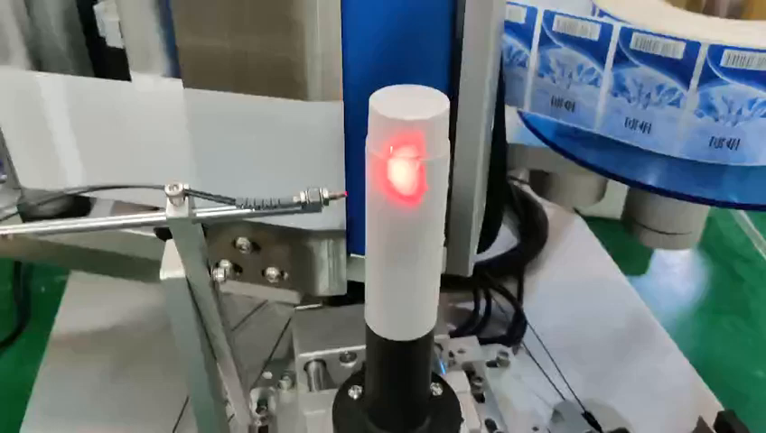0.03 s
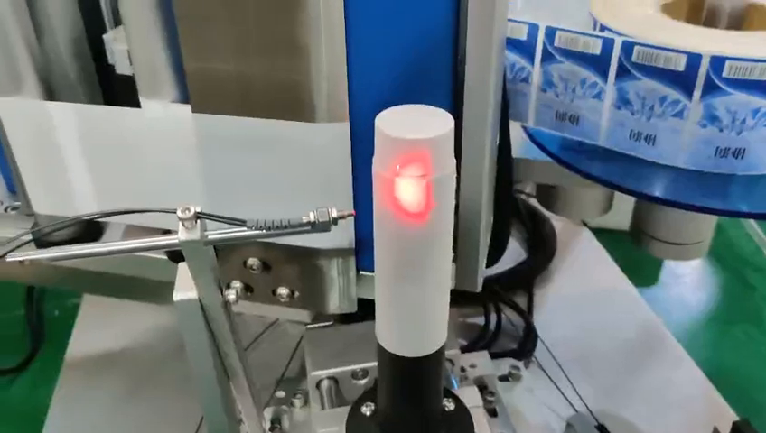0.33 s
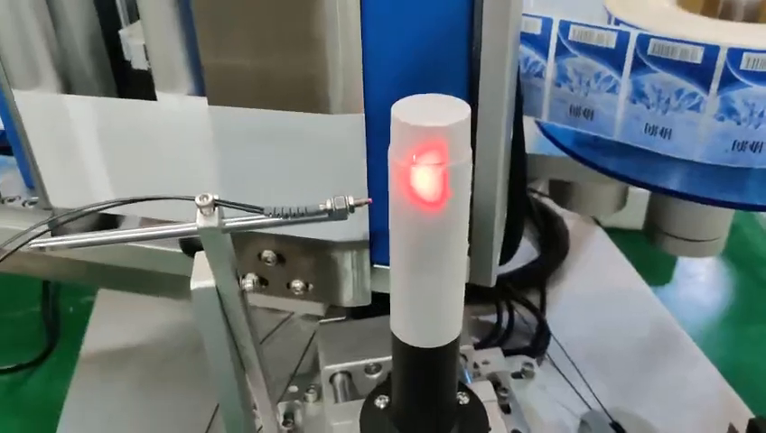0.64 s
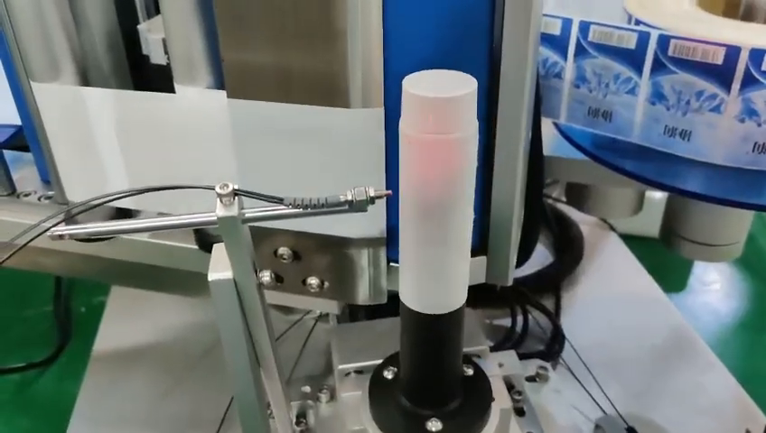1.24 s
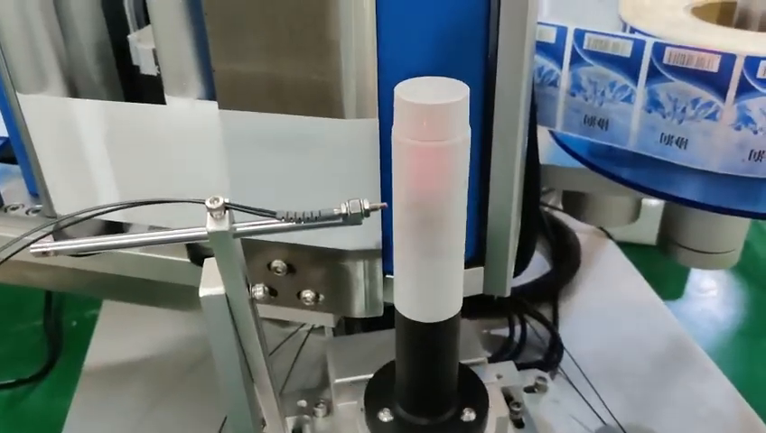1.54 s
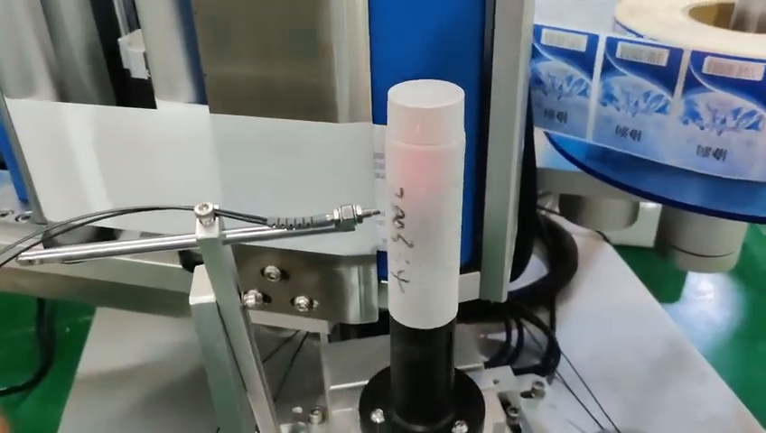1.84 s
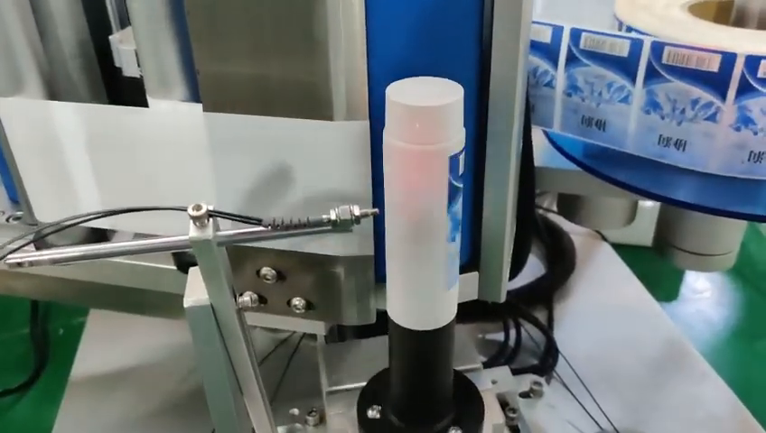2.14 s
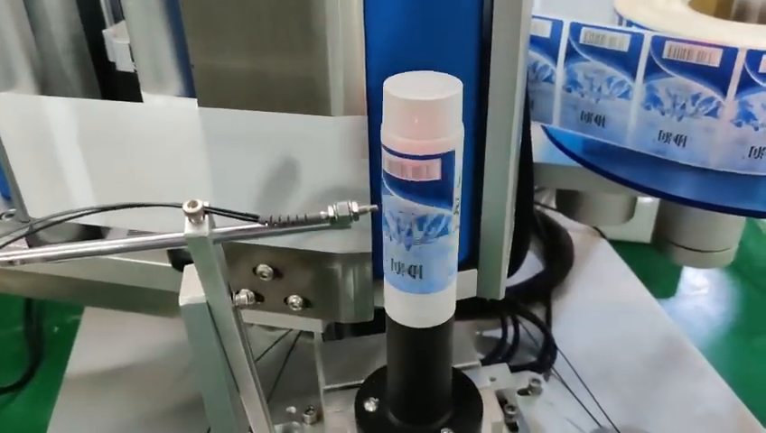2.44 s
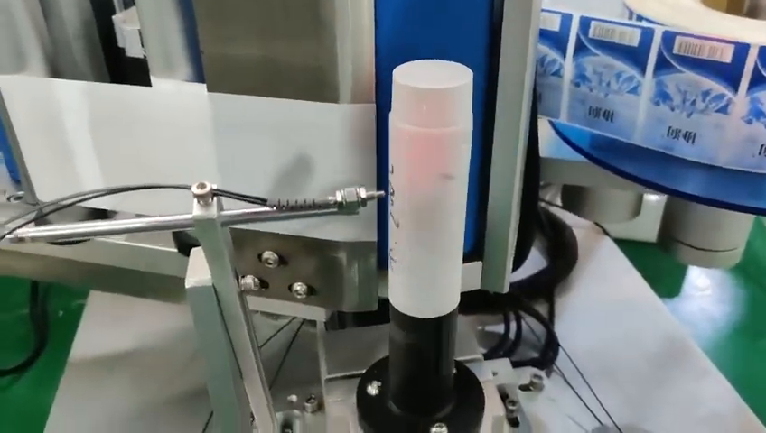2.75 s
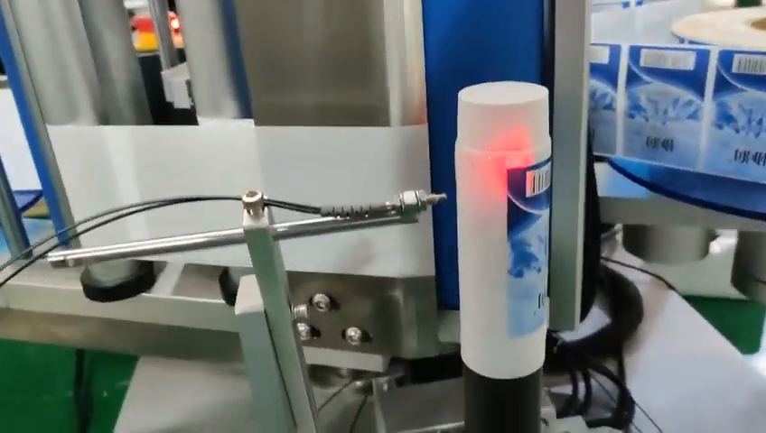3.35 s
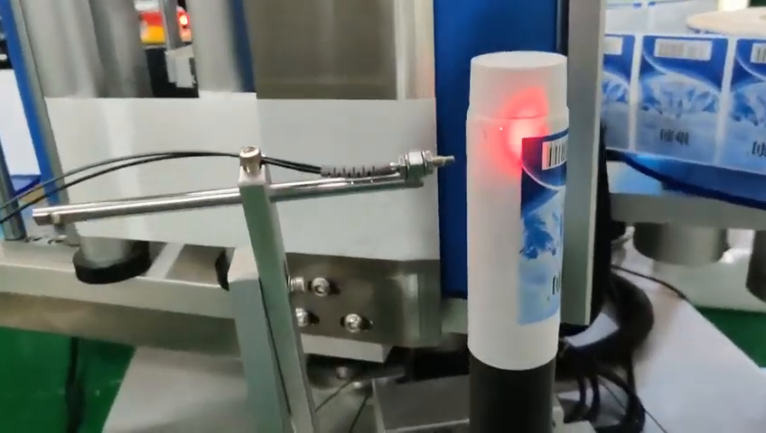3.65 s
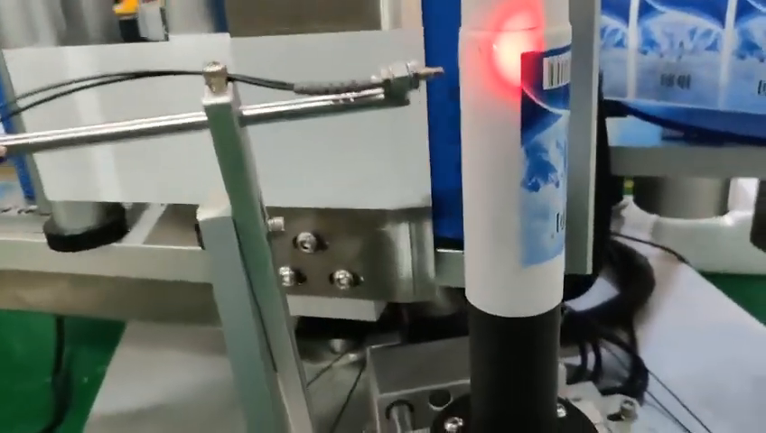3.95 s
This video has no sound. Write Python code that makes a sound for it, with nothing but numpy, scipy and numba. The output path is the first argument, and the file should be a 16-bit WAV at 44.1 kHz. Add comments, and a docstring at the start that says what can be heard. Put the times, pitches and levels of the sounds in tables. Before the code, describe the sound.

Close up in a workshop, a labeling machine runs with a steady hum and rushing hiss. Two sharp pneumatic clacks with short air bursts frame a soft paper rustle and faint motor whine. Gusts rumble on the microphone throughout.

```python
"""A workshop, with a phone held close to a labelling machine that hums and hisses. An air valve clacks
and vents as a tube is gripped; a feed motor whines, the label rustles on, and the valve lets go.
A draught buffets the phone's two microphone ports throughout. The recorder fades in, and its limiter
ducks each channel after the strong gusts."""
import sys
import numpy as np
from scipy import signal
from scipy.fft import rfft, irfft
from scipy.io import wavfile
from scipy.ndimage import uniform_filter1d, minimum_filter1d
from numba import njit

SR = 44100
rng = np.random.default_rng(int(sys.argv[2]) if len(sys.argv) > 2 else 0)


def bounce(signal):
    """Save signal as a 16-bit WAV file at the path given by the first command-line argument."""
    frames = np.transpose(np.atleast_2d(signal))
    limited = np.clip(frames, -1, 1)
    pcm = np.round(limited * 32767).astype(np.int16)
    wavfile.write(sys.argv[1], SR, pcm)


N = 176400


def spool_clicks(decay_s=.0012):
    """The valve spool shifts with tiny, bright clicks."""
    # Spool clicks: start_s, level_db, hold_s
    clicks = [(1.0372, -20, 0.0037), (1.2876, -24, 0.005), (3.0332, -7.5, 0.0036)]
    # Click spectrum: frequency_hz, density_db
    spectrum = [(200, -10), (1500, -2), (3000, 4), (4400, 6.5), (6500, -6), (9000, -7), (13800, -2),
                (16000, -1)]
    envelope = sum(undb(db) * burst(at, hold, decay_s) for at, db, hold in clicks)
    return unit(colour(noise(), spectrum)) * envelope


def piston_knocks(crack_db=-3.5, crack_s=.003, detune=.013):
    """The piston knocks home with a crack and sets the cylinder and bracket ringing."""
    # Piston impacts: start_s, level_db
    knocks = [(1.053, -2), (3.0426, 5.5)]
    # Cylinder and bracket modes: pitch_hz, level_db, t60_s
    modes = [(430, 11, 0.0051), (764, 3.5, 0.0064), (1400, -18, 0.053), (1983, -9, 0.081),
             (2386, 1.5, 0.013), (2650, -16, 0.019), (3200, -20, 0.05), (3900, -13, 0.026),
             (4460, -21, 0.046)]
    # Crack spectrum: frequency_hz, density_db
    spectrum = [(100, -30), (2500, -8), (6000, -40), (16000, 14)]
    crack = undb(crack_db) * unit(colour(noise(), spectrum))
    out = np.zeros((2, N))
    for at, db in knocks:
        age = np.maximum(times() - at, 0)
        ring = np.zeros((2, N))
        for hz, mode_db, t60 in modes:
            pitch = hz * (1 + detune * rng.standard_normal((2, 1)))
            ring += undb(mode_db - 60 * age / t60) * np.sin(2 * np.pi * pitch * age)
        out += undb(db) * (.5 * ring + crack * burst(at, 0, crack_s))
    return out


def air_vents(decay_s=.055, close_s=.008, outlet_width_hz=1300, sputter_db=-1):
    """Air sputters through a resonant outlet, fading until the cylinder is empty."""
    # Air releases: start_s, level_db, time_to_empty_s, outlet_hz, outlet_boost_db
    vents = [(1.055, -10.5, 0.064, 8370, 14), (3.047, -11.5, 0.052, 6600, 3)]
    # Jet spectrum: frequency_hz, density_db
    spectrum = [(300, -13), (1600, -16), (2400, 1), (3400, 3.5), (4300, 6), (5400, 2), (6400, -3),
                (7800, -12), (9700, -12), (11300, -6), (13000, -1), (14200, -5), (15600, -3)]
    out = np.zeros((2, N))
    for at, db, empty, outlet_hz, outlet_db in vents:
        outlet = undb(outlet_db * np.exp(-((freqs() - outlet_hz) / outlet_width_hz) ** 2))
        hiss = irfft(rfft(colour(noise(), spectrum)) * outlet, N)
        jet = unit(hiss * undb(sputter_db * walk(400)))
        out += undb(db) * jet * burst(at, 0, decay_s) * burst(at, empty, close_s)
    return out


def pneumatics(room_db=-16, room_t60_s=.32, right_bias_db=4.5):
    """Valve and cylinder sound to the right of the phone, and the workshop answers."""
    direct = spool_clicks() + piston_knocks() + air_vents()
    room = undb(room_db) * echoes(direct, room_t60_s / np.log(1000))
    return (direct + room) * undb([[-right_bias_db / 2], [right_bias_db / 2]])


def label_feed(motor_hz=2115, grain_db=1.8):
    """The feed motor whines while label and backing paper slide with a fine grain."""
    # Paper slides: centre_s, length_s, left_db, right_db
    rustles = [(1.166, 0.18, -41.5, -29), (1.784, 0.23, -41, -37), (1.985, .08, -46, -39),
               (2.277, 0.081, -43.5, -38), (2.745, 0.46, -52, -44.5), (2.948, 0.063, -58, -33.5),
               (3.13, 0.12, -41, -31.5)]
    # Paper spectrum: frequency_hz, density_db
    spectrum = [(1000, -37), (4000, -3.5), (7500, 3), (9300, -6.5), (13000, -1.5), (15500, -2)]
    # Feed motor whine: time_s, level_db
    motor_level = [(1.55, -60), (1.7, -40), (1.95, -46), (2.1, -52)]
    paper = unit(colour(noise(), spectrum) * undb(grain_db * walk(300)))
    sliding = sum(undb([[left], [right]]) * swell(at, length) for at, length, left, right in rustles)
    turns = np.cumsum(1 + .0005 * walk(10)) * motor_hz / SR
    whine = np.sqrt(2) * np.sin(2 * np.pi * turns)
    return paper * sliding + whine * curve(motor_level)


def fan_rush(shared=.18, left_lag_s=.000403, treble_hz=5700):
    """The fans rush with a drifting treble; a share reaches both ports alike, the left one later."""
    # Running noise of the machine: frequency_hz, left_db_per_hz, right_db_per_hz
    spectrum = [(30, -50, -82), (106, -52, -50), (202, -55, -50), (322, -58, -54.5), (764, -61, -62.5),
                (950, -62, -63.5), (1660, -67.5, -67.5), (2600, -68, -66), (3450, -69, -67.5),
                (4780, -71, -72.5), (5850, -80.5, -73), (7900, -85.5, -78), (9260, -87, -88),
                (13100, -90.5, -86), (16000, -89, -93)]
    # Gain of the hiss above treble_hz: time_s, left_db, right_db
    treble = [(0, -4.5, 1), (1.5, 1, 5.5), (3.2, -2, 0), (3.5, 1, 5), (3.85, -4, -4), (4, -3, 0.5)]
    delay = np.exp(-2j * np.pi * freqs() * np.array([[left_lag_s], [0]]))
    direct = irfft(rfft(rng.standard_normal(N)) * delay, N)
    left, right = np.sqrt(shared) * direct + np.sqrt(1 - shared) * noise()
    rush = np.array([colour(left, spectrum, 1), colour(right, spectrum, 2)]) * np.sqrt(SR / 2)
    body = irfft(rfft(rush) / (1 + (freqs() / treble_hz) ** 4), N)
    return body + (rush - body) * np.array([curve(treble, 1), curve(treble, 2)])


def housing(width_hz=1300):
    """The housing resonates in a band of noise, louder and shifting as the phone moves in."""
    # Housing resonance: time_s, level_db, centre_hz
    track = [(0, -54, 2600), (.4, -35, 2620), (.75, -40, 2600), (1.5, -38.5, 2650), (2.2, -40.5, 2500),
             (3.05, -41, 2300), (3.24, -37.5, 2300), (3.55, -30, 2700), (3.8, -32.5, 2750), (4, -36, 2650)]
    at, _, centre_hz = np.array(track).T
    phase = 2 * np.pi * np.cumsum(np.interp(times(), at, centre_hz)) / SR
    shape = 1 / (1 + (2 * freqs() / width_hz) ** 2)
    band = sum(irfft(rfft(noise()) * shape, N) * wave(phase) for wave in (np.cos, np.sin))
    return unit(band) * curve(track)


def motor_hum(wander=.0084):
    """Motor and fan hum, wandering slightly in pitch and level."""
    # Hum partials: pitch_hz, level_db
    partials = [(128, -42), (256, -40), (512, -52)]
    phase_per_hz = 2 * np.pi * np.cumsum(1 + wander * walk(11.8)) / SR
    return np.sqrt(2) * sum(undb(db + 2 * walk(5.3)) * np.sin(hz * phase_per_hz) for hz, db in partials)


def wind():
    """A draught rumbles and thuds on each microphone port, and its gusts add spiky eddies."""
    # Steady draught: time_s, left_db, right_db
    draught_level = [(.29, -44, -26), (.5, -18, -18.5), (.7, -25, -19), (.87, -14, -10), (1.0, -11.5, -7.5),
                     (1.3, -20, -23), (1.7, -21.5, -15.5), (2.1, -21, -12.5), (2.5, -24, -12),
                     (2.85, -9, -22.5), (3.1, -20.5, -28), (3.3, -13, -14.5), (3.8, -9.5, -28.5),
                     (4, -24.5, -16)]
    # Gusts: centre_s, length_s, level_db, port
    gusts = [(0.54, 0.029, -13.5, "R"), (0.573, 0.027, -4.5, "R"), (0.604, 0.02, -9.5, "R"),
             (0.72, 0.049, -16, "R"), (0.791, 0.018, 2, "R"), (0.952, 0.026, -11, "R"),
             (1.022, 0.039, -13.5, "R"), (1.158, 0.0064, -0.5, "R"), (1.181, 0.021, 1, "R"),
             (1.432, 0.026, -14.5, "R"), (1.467, 0.011, -3.5, "R"), (1.47, 0.011, -13, "L"),
             (1.625, 0.018, -9.5, "R"), (1.676, 0.065, -8.5, "R"), (1.701, 0.012, 2, "R"),
             (1.852, 0.059, -6, "R"), (1.91, 0.019, -10.5, "R"), (2.04, 0.0084, -8.5, "R"),
             (2.069, 0.016, 3, "R"), (2.105, 0.047, -7.5, "R"), (2.16, 0.0098, -8, "R"),
             (2.201, 0.0099, -1.5, "R"), (2.3, 0.028, -7.5, "L"), (2.275, 0.045, -10.5, "R"),
             (2.324, 0.023, -4.5, "R"), (2.44, 0.072, -13, "R"), (2.543, 0.02, -7, "R"),
             (2.68, 0.016, -4, "R"), (2.775, 0.03, -4, "L"), (2.79, 0.044, -12.5, "R"),
             (2.825, 0.033, -12.5, "L"), (2.845, 0.032, -7.5, "R"), (2.91, 0.037, -10, "L"),
             (2.98, 0.078, -9, "R"), (3.232, 0.023, -9.5, "L"), (3.28, 0.028, -16, "R"),
             (3.316, 0.014, -10, "L"), (3.362, 0.055, -10, "L"), (3.38, 0.018, -7.5, "R"),
             (3.5, 0.026, -4.5, "R"), (3.525, 0.011, -3.5, "R"), (3.49, 0.14, -21, "L"),
             (3.658, 0.01, -7.5, "L"), (3.797, 0.012, -7, "L"), (3.84, 0.011, -5.5, "L")]
    # Big slow eddies that thud: centre_s, length_s, level_db, port
    thuds = [(0.6, 0.047, -8.5, "R"), (0.868, 0.038, -3, "L"), (1.005, 0.031, -13.5, "L"),
             (1.709, 0.11, -6, "R"), (2.162, 0.018, -8, "L"), (2.294, 0.048, -9, "L"),
             (2.271, .05, -13.5, "R"), (3.495, 0.038, -14.5, "R"), (3.618, 0.019, -17, "L"),
             (3.802, 0.1, -8, "L")]
    # Spectra of the rumble, eddies and thuds: frequency_hz, density_db
    rumble_spectrum = [(8, -22.5), (25, 4.5), (50, 5.5), (90, -1.5), (160, -5.5), (300, -19.5),
                       (600, -32.5), (1500, -59)]
    eddy_spectrum = [(15, -8), (50, 3), (120, 1), (250, -2.5), (500, -10), (1000, -15), (2500, -25),
                     (8000, -60)]
    thud_spectrum = [(15, -14), (55, 3), (130, 3.5), (280, -5.5), (500, -22.5), (1200, -54.5)]
    flutter_db, flutter_spread_db = -12.5, 7.5  # weak puffs, relative to the draught
    flicker_db, surge_db = 2.5, 2
    unit_force_corner_hz, spikiness = 870, .31
    rumble = unit(colour(noise(), rumble_spectrum))
    eddies = unit(colour(noise(), eddy_spectrum))
    eddies = unit(eddies + spikiness * (eddies ** 2 - 1))  # pressure grows with air speed squared
    heave = unit(colour(noise(), thud_spectrum))
    out = np.zeros((2, N))
    for k, port in enumerate("LR"):
        draught, puffs = curve(draught_level, k + 1), walk(9.9)
        flutter = draught * undb(flutter_db + flutter_spread_db * puffs)
        force = (flutter + port_swells(gusts, port)) * undb(flicker_db * walk(91))
        # Stronger gusts shed smaller eddies and sound brighter.
        corner_hz = np.clip(unit_force_corner_hz * force ** .67, 20, SR / 10)
        out[k] += force * lowpass(eddies[k], corner_hz)
        out[k] += rumble[k] * draught * undb(surge_db * puffs)
        out[k] += heave[k] * port_swells(thuds, port)
    return out


def echoes(x, decay_s):
    """Dense reflections die away with this time constant, different on each side."""
    tail = unit(noise() * burst(0, 0, decay_s)) / np.sqrt(N)
    return signal.fftconvolve(x, tail, axes=1)[:, :N]


def limiter(x, limit_db=-1.5, attack_s=.0037, hold_s=.087, release_s=.008):
    """The recorder turns down just ahead of each peak, holds, then recovers."""
    log_gain = np.minimum(0, np.log(undb(limit_db) / (np.abs(x) + 1e-9)))
    attack, half_hold = int(attack_s * SR), int(hold_s * SR) // 2
    held = minimum_filter1d(log_gain, 2 * half_hold + 1, origin=half_hold)
    ahead = minimum_filter1d(held, 2 * attack + 1)
    pole = np.exp(-1 / (release_s * SR))
    recovery = signal.lfilter([1 - pole], [1, -pole], ahead)
    return x * np.exp(uniform_filter1d(np.minimum(ahead, recovery), attack))


def undb(db):
    """Decibels to gain."""
    return 10 ** (np.asarray(db) / 20)


def unit(x):
    """Scale to rms 1."""
    return x / np.sqrt(np.mean(x ** 2))


def times():
    """Time of each sample."""
    return np.arange(N) / SR


def freqs():
    """Frequency of each spectral bin."""
    return np.maximum(np.arange(N // 2 + 1) * SR / N, 1)


def curve(rows, column=1):
    """One dB column of a table as a gain over time."""
    rows = np.array(rows)
    return undb(np.interp(times(), rows[:, 0], rows[:, column]))


def colour(x, rows, column=1):
    """Filter by a table of frequency_hz, gain_db points."""
    rows = np.array(rows)
    gain_db = np.interp(np.log(freqs()), np.log(rows[:, 0]), rows[:, column])
    return irfft(rfft(x) * undb(gain_db), N)


def noise():
    """Unrelated white noise for left and right."""
    return rng.standard_normal((2, N))


def walk(hz):
    """Random drift of rms 1, moving up to about hz times a second."""
    return unit(irfft(rfft(rng.standard_normal(N)) * np.exp(-(freqs() / hz) ** 2), N))


def swell(at, length):
    """Bell-shaped rise and fall, length wide at half height."""
    return .5 ** ((2 * (times() - at) / length) ** 2)


def port_swells(rows, port):
    """Sum of the swells that land on one microphone port."""
    return sum(undb(db) * swell(at, length) for at, length, db, side in rows if side == port)


def burst(at, hold, decay):
    """Sudden start, hold, exponential fall."""
    age = times() - at
    return (age >= 0) * np.exp(-np.maximum(age - hold, 0) / decay)


@njit
def lowpass(x, hz):
    """Two-pole low-pass with a moving corner."""
    y, band_state, low_state = np.empty(len(x)), 0., 0.
    for i in range(len(x)):
        g = np.tan(np.pi * hz[i] / SR)
        band = (band_state + g * (x[i] - low_state)) / (1 + g * (g + 1.4))
        y[i] = low_state + g * band
        band_state, low_state = 2 * band - band_state, 2 * y[i] - low_state
    return y


def scene():
    """Valve and label feed over the running machine, with the draught on the microphone."""
    machine = (fan_rush() + housing()) * undb(.5 * walk(1.3)) + motor_hum()
    return machine + pneumatics() + label_feed() + wind()


def record(dry):
    """The microphone rounds big peaks; the recorder fades in, limits each channel and cuts the top."""
    # Recorder fade-in: time_s, gain_db
    fade_in = [(.164, -74), (.172, -18.5), (.2, -8.5), (.26, -6), (.36, 0)]
    overload_db, top_hz = 9, 15700
    ceiling = undb(overload_db)
    picked_up = ceiling * np.tanh(dry / ceiling) * curve(fade_in)
    limited = np.array([limiter(channel) for channel in picked_up])
    return signal.sosfilt(signal.ellip(10, .2, 80, top_hz, fs=SR, output="sos"), limited)


dry = scene()
out = record(dry)
bounce(out)
```